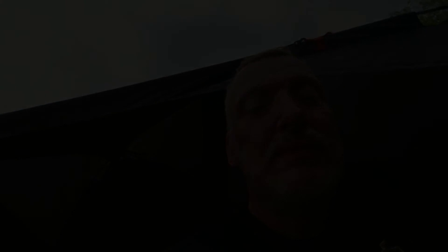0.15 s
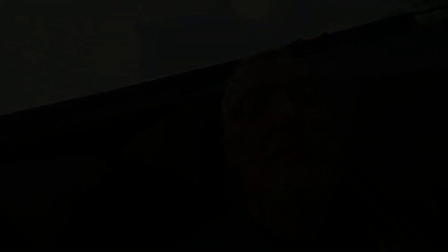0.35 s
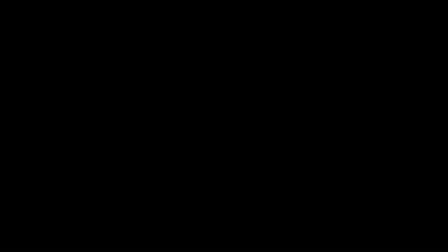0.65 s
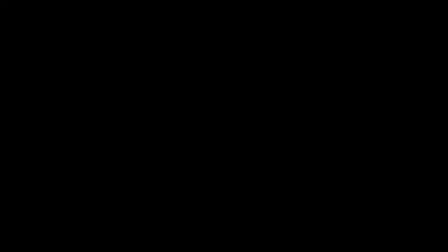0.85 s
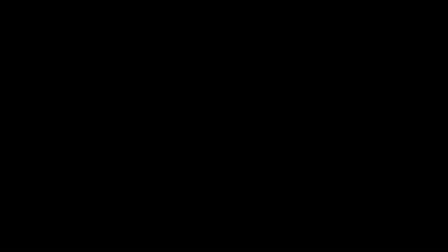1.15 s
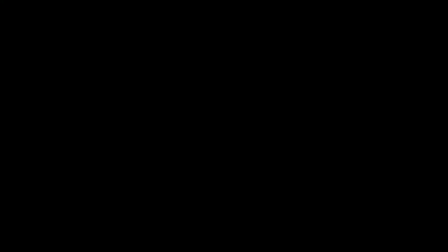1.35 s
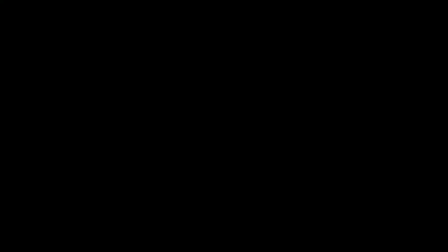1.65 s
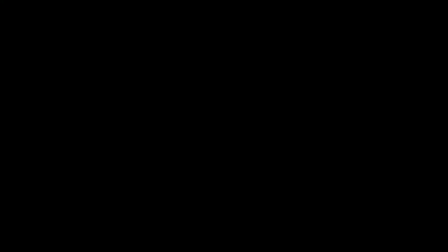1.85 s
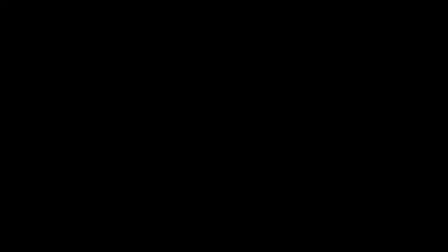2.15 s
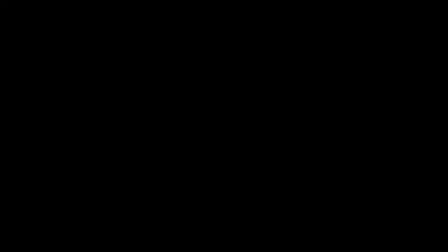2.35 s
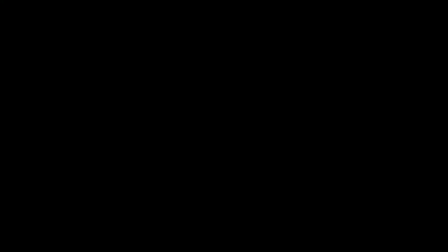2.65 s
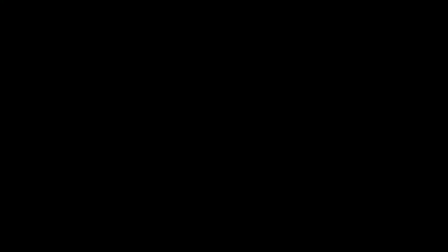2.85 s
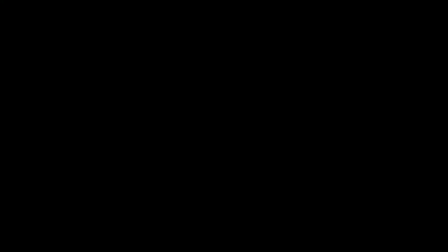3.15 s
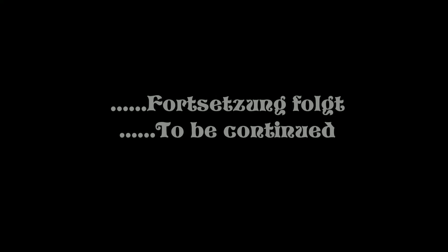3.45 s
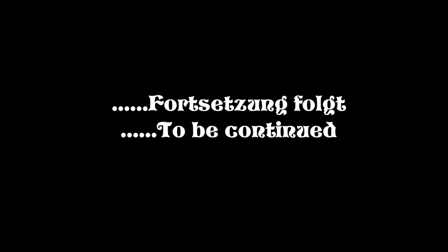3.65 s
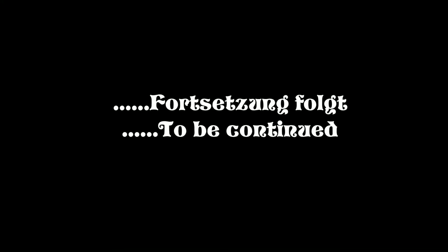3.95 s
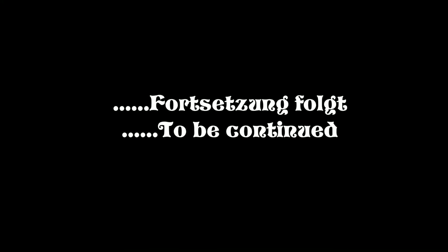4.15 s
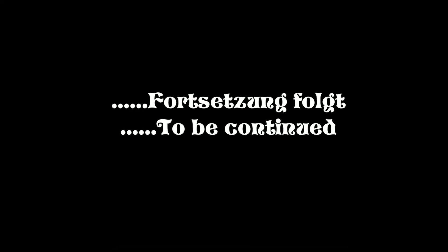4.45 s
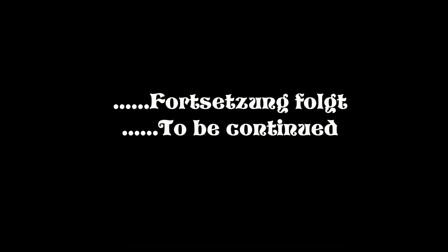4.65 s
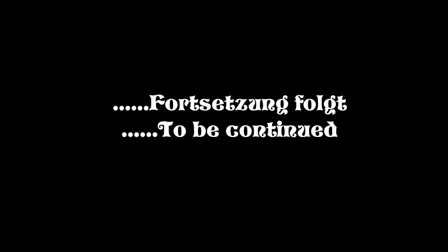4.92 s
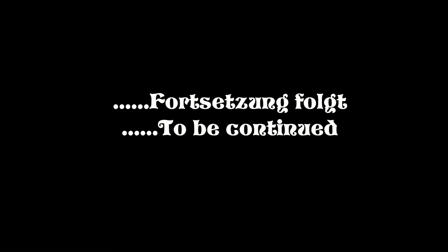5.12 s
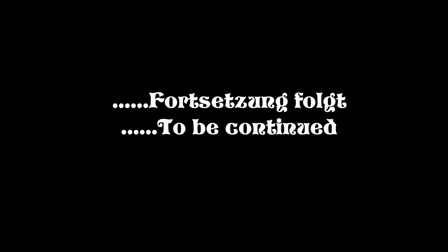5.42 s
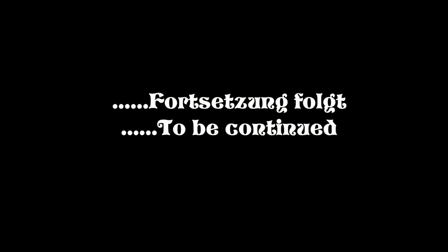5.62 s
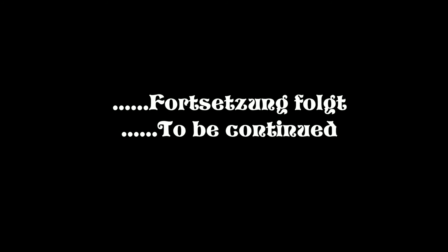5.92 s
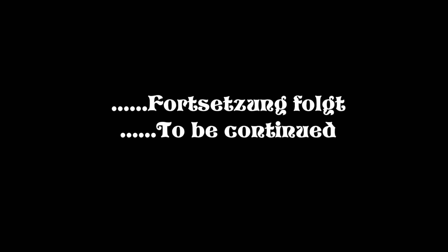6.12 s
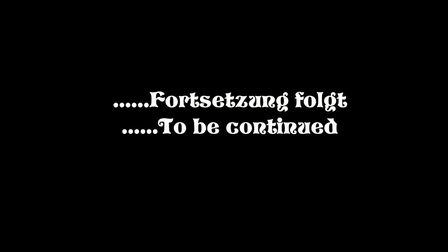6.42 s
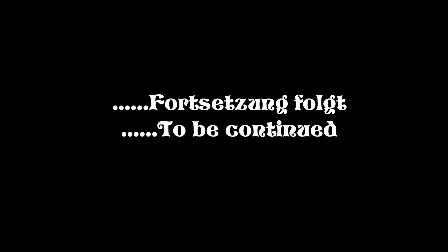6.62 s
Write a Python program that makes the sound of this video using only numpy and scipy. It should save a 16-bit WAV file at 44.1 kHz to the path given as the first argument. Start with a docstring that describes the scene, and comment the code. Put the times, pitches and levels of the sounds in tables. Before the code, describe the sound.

A motorcycle is started close to the microphone in an open place with nearby walls. First only low rumble and very faint ticks; then a sharp click, harsh geared cranking, coughs of gas and a failing slowdown. A brief pause with a faint motor whine, a second shorter grind, and the engine fires, holding a loud, quick, even idle with exhaust barks and tapping valves until the end.

```python
"""Outdoors near walls: low rumble, then a motorcycle is started. The switch clicks, the starter grinds and the
engine spits gas but dies; at the second try it catches and idles at about six cycles a second. Exhaust barks are
shaped noise, pipe and intake boom as sines bent by the piston, and valve gear and casing clatter as damped modes.
The starter is a run of tooth contacts ringing its housing, with a mesh tone that sags at each shove.
Filtered noise makes the rumble; each close part has its own short echoes."""
import sys
import numpy as np
from scipy import signal
from scipy.fft import rfft, irfft, next_fast_len
from scipy.io import wavfile
from scipy.ndimage import uniform_filter1d, map_coordinates

SR = 44100
rng = np.random.default_rng(int(sys.argv[2]) if len(sys.argv) > 2 else 0)


def transcribe(u):
    """Save the signal u as a 16-bit wav file named by the first command-line argument.

    u: samples, shape (n,) or (channels, n), limited to [-1, 1]; the rate is SR.
    q: integer samples, one column per channel.
    """
    v = np.clip(np.atleast_2d(u).T, -1, 1)
    q = np.round(v * 32767).astype(np.int16)
    wavfile.write(sys.argv[1], SR, q)


N = 298998
TIME = np.arange(N) / SR

# exhaust barks, one per engine cycle: [t/s, peak level/dB, casing ring level/dB, ring f/Hz]
FIRINGS = [(3.351, -10, -6.5, 2390), (3.5574, -8.5, -9.5, 2550), (3.722, -5.5, -13.5, 3020),
           (3.9032, -10.5, -7.5, 2600), (4.069, -5, -16, 4030), (4.2311, -9.5, -14, 4240),
           (4.396, -7, -16, 3740), (4.553, -8.5, -12, 2750), (4.722, -7, -9, 2730),
           (4.888, -6.5, -14.5, 3870), (5.062, -7, -10, 2830), (5.2272, -5, -7.5, 2836),
           (5.395, -8, -18, 2080), (5.559, -7.5, -8.5, 2870), (5.733, -8.5, -19, 2020),
           (5.891, -7.5, -12.5, 2120), (6.061, -9, -19.5, 2100), (6.223, -7, -15.5, 2100),
           (6.39, -7, -18, 3500), (6.561, -8.5, -14.5, 2030), (6.728, -9.5, -8, 2420)]
# intakes, each ending in a knock; strong and weak come to alternate: [knock t/s, gulp level/dB, knock level/dB]
INTAKES = [(3.509, -18.5, -15.5), (3.69, -19, -16), (3.864, -26, -14.5), (4.035, -17.5, -14),
           (4.2, -21, -11.5), (4.362, -21, -14.5), (4.521, -21, -14), (4.685, -21, -15.5),
           (4.855, -22.5, -15), (5.026, -21.5, -17), (5.192, -20.5, -16.5), (5.359, -27, -18),
           (5.524, -20, -16), (5.695, -25, -23), (5.862, -21.5, -17.5), (6.028, -28, -19.5),
           (6.195, -20, -17.5), (6.356, -27, -26), (6.527, -20, -21), (6.696, -23, -19.5)]
# spectrum of rattling engine metal: [f/Hz, level/dB]
METAL = [(200, 5), (400, 0.5), (620, 7), (1000, 0.5), (1350, -1.5), (1700, -1), (2050, 2.5), (2450, -10.5),
         (3000, -2), (4000, -7), (5500, -11), (8000, -18.5), (12000, -24.5), (15000, -55.5)]

BOOM_DB, SETTLE_DB_PER_S = -15.5, 1.2  # boom and light valve taps ease as the idle settles
BARK_DB = -4  # gas bark against the peak of its firing
SNAP_S = .0018  # rise time of switch snaps and small ticks


def undb(db):
    """Decibels to gain."""
    return 10 ** (np.asarray(db) / 20)


def unit(x):
    """Scale to rms 1."""
    return x / np.sqrt(np.mean(x ** 2) + 1e-20)


def noise(size=N):
    """White noise."""
    return rng.standard_normal(size)


def walk(rate):
    """Random levels held 1 / rate s and slewed; spread near 1."""
    hold = max(int(SR / rate), 1)
    steps = np.repeat(noise(N // hold + 1), hold)
    return 1.318 * uniform_filter1d(steps, hold)[:N]


def on_bins(points, size):
    """Read (Hz, value) points at the bins of an FFT, along a log frequency axis."""
    hz, value = np.transpose(points)
    bin_hz = np.arange(size // 2 + 1) * SR / size
    return np.interp(np.log(bin_hz + 1), np.log(hz), value)


def colour(x, points, size=4096):
    """Causal (minimum-phase) filter of unit power with the given spectrum."""
    cepstrum = irfft(on_bins(points, size) * np.log(10) / 20)
    cepstrum[1:size // 2] *= 2
    cepstrum[size // 2 + 1:] = 0
    response = irfft(np.exp(rfft(cepstrum)))
    return signal.fftconvolve(x, response / np.linalg.norm(response))[:N]


def ring(x, modes):
    """Damped resonances (Hz, width Hz, dB) of unit power; a wider mode dies sooner."""
    t = TIME[:SR // 4]
    response = sum(undb(db) * width * np.exp(-np.pi * width * t) * np.sin(2 * np.pi * hz * t)
                   for hz, width, db in modes)
    return signal.fftconvolve(x, response / np.linalg.norm(response))[:N]


def add(track, s, sound):
    """Mix a sound in at a time."""
    start = int(np.clip(s * SR, 0, N))
    track[start:start + len(sound)] += sound[:N - start]


def blows(rows, rise, decay):
    """Envelope of (s, dB) blows that build up and die away; overlaps add in power."""
    t, power = TIME[:SR // 5], np.zeros(N)
    shape = np.minimum(t / rise, 1) * np.exp(-np.maximum(t - rise, 0) / decay)
    for s, db in rows:
        add(power, s, (undb(db) * shape) ** 2)
    return np.sqrt(power)


def swells(rows):
    """Sum of soft-edged plateaus (s, length s, height)."""
    out = np.zeros(N)
    for s, length, height in rows:
        add(out, s, height * signal.windows.tukey(int(length * SR), .5))
    return out


def impacts(rate, spread_db):
    """Dense metal contacts of unequal size."""
    hits = rng.random(N) < rate / SR
    return unit(hits * noise() * undb(spread_db * np.clip(noise(), -2, 2)))


def narrow(hz, width_hz):
    """A narrow, rough band of sound that follows a pitch curve."""
    turn = 2 * np.pi * np.cumsum(hz) / SR
    return (walk(width_hz) * np.sin(turn) + walk(width_hz) * np.cos(turn)) / 1.08


def cycles():
    """Each engine cycle as (s, period s, boom dB, bark dB)."""
    s, peak_db, _, _ = np.transpose(FIRINGS)
    period = np.diff(s)
    boom_db = BOOM_DB - SETTLE_DB_PER_S * (s - s[0])
    return np.transpose([s, np.append(period, period[-1]), boom_db, peak_db + BARK_DB])


def exhaust():
    """A sharp bark as the valve opens, a hissing tail, and spits of gas."""
    # spits of gas: [t/s, length/s, level/dB]
    spit_rows = [(1.59, 0.055, -24.5), (1.666, 0.12, -30), (1.763, 0.048, -18.5), (1.878, 0.029, -32),
                 (2.14, 0.087, -32.5), (2.407, 0.11, -39), (3.425, 0.062, -28.5), (3.975, 0.019, -29),
                 (5.465, 0.014, -28.5), (5.802, 0.0081, -21), (6.131, 0.015, -23), (6.462, 0.014, -26.5)]
    # spectra of the bark and of the loose gas: [f/Hz, level/dB]
    bark_spectrum = [(150, 9.5), (300, -1.8), (480, -10), (750, -6), (1300, -10.5), (1900, -6.5),
                     (2400, -6), (3000, -4), (4200, -11.5), (6200, -9.5), (8000, -11), (10000, -10.5),
                     (12000, -13.5), (15000, -20)]
    gas_spectrum = [(200, -30), (400, -3), (580, 5), (800, -11.5), (1200, -22), (2000, -4.5), (3000, -6.5),
                    (4500, -18), (6500, -14.5), (9000, -13.5), (12000, -22), (15000, -22)]
    spit_spectrum = [(1000, 5.0), (3000, -4.0), (8000, -5.5), (12000, -3.0), (15000, -11.0)]

    barks = cycles()[:, [0, 3]]
    crack = blows(barks, rise=0.0062, decay=0.0021) * undb(-2.0)
    tail = blows(barks, rise=0.02, decay=0.0035) * undb(-34)
    # a soft breath of gas about half a cycle after each firing
    breaths = [(s + 0.485 * period, -34 + 0.43 * noise(size=1)[0]) for s, period, _, _ in cycles()]
    overlap = blows(breaths, rise=0.0033, decay=0.015)
    spits = swells([(s, length, undb(db)) for s, length, db in spit_rows])
    gas = colour(noise() * (overlap + .6 * spits), gas_spectrum)
    bright_gas = colour(noise() * spits * 0.61, spit_spectrum)
    return colour(impacts(16000, 10.3) * crack + noise() * tail, bark_spectrum) + gas + bright_gas


def gulp(length, open_hz, low_hz, close_hz, swell_db, steep):
    """Cylinder and pipe boom as one vessel whose pitch follows the piston; the waves are bent lopsided by a set
    steepness."""
    piston = np.linspace(-1, 1, int(length * SR))
    bend_hz = np.where(piston < 0, open_hz - low_hz, close_hz - low_hz)
    hz = low_hz + bend_hz * piston ** 2
    wave = -np.sin(2 * np.pi * np.cumsum(hz) / SR)
    opening = signal.windows.tukey(len(piston), .25) * undb(swell_db * piston)
    return np.sqrt(2) * (wave + steep * (wave ** 2 - .5)) * opening


def booms():
    """A firm exhaust stroke and a weaker intake each cycle; the valves kick the pipe as they open and shut."""
    # the exhaust stroke: [delay after firing/s, length/s, opening f/Hz, mid-stroke f/Hz, closing f/Hz]
    blowdown = (.0056, .0687, 123.4, 50.7, 111.2)
    # the intake stroke: [lead before its knock/s, length/s, opening f/Hz, mid-stroke f/Hz, closing f/Hz]
    suction = (.053, .061, 42, 60, 120)
    # the cylinder gulps air while it is cranked: [t/s, length/s, level/dB]
    crank_gulps = [(1.725, 0.145, -32.5), (1.859, 0.086, -32.5), (2.019, 0.116, -24), (2.159, 0.106, -23.5),
                   (3.055, 0.13, -30.5)]
    # resonances of the exhaust pipe: [f/Hz, width/Hz, level/dB]
    pipe_modes = [(122, 18.2, 4), (165, 31, -17), (206.8, 22, -2.5), (257, 22, -16), (304, 26, -17)]
    flow_spectrum = [(70, -32.5), (120, 0.5), (170, -1.5), (225, 0.5), (300, -7.0), (400, -25.5), (900, -39.5)]
    opening_s, closing_s = .0096, .056  # exhaust valve, after the firing
    intake_shut_s = .008  # before the intake's knock

    out, puffs = np.zeros(N), np.zeros(N)
    for s, _, db, _ in cycles():
        stroke = gulp(*blowdown[1:], swell_db=-1.5 + 0.99 * noise(size=1), steep=-0.12)
        add(out, s + blowdown[0], undb(db) * stroke)
        add(puffs, s + opening_s, -undb(db + 19.5 + 1.5 * noise(size=1)))
        add(puffs, s + closing_s, undb(db + 24 + 3.1 * noise(size=1)))
    for s, db, _ in INTAKES:
        add(out, s - suction[0], undb(db) * gulp(*suction[1:], swell_db=4.0, steep=0.18))
        add(puffs, s - intake_shut_s, -undb(db + 19 + 1.5 * noise(size=1)))
    # rough flow noise rides on the running strokes, not on the cranking gulps
    flow = uniform_filter1d(np.abs(out), SR // 50) * noise()
    for s, length, db in crank_gulps:
        add(out, s, undb(db) * gulp(length, 71.7, 52.2, 81, swell_db=0.0, steep=0.14))
    return out + ring(puffs, pipe_modes) + undb(-15.5) * colour(flow, flow_spectrum)


def strike(taps, focus=6):
    """Each tap (s, dB, Hz) rings the casing modes near its own pitch (focus: dB/octave), in a fresh mix."""
    # what the engine casing rings with: [f/Hz, width/Hz, level/dB]
    casing = [(545, 67, 2), (636, 45, -5), (800, 11, -18), (988, 147, 7), (1660, 101, -3), (2016, 88, -8.5),
              (2214, 160, -1.5), (2665, 253, 4.5), (2892, 176, -0.5), (3254, 200, 2), (3706, 156, 3),
              (4210, 180, -6), (4805, 77, -7), (5170, 190, -4), (6800, 89, -0.5)]
    scatter_db, detune_share = 4.5, .018

    t, out = TIME[:SR // 30], np.zeros(N)
    hz, width, mode_db = np.transpose(casing)[:, :, None]
    for s, db, centre_hz in taps:
        size, detune, phase = rng.standard_normal((3, len(casing), 1))
        away = np.log2(hz / centre_hz)  # octaves
        near_db = 15.7 * np.exp(-(away / 0.14) ** 2)
        scattered_db = mode_db + scatter_db * np.clip(size, -1.5, 1.5)
        gain = undb(scattered_db - focus * np.abs(away) + near_db)
        tones = np.sin(2 * np.pi * (hz * (1 + detune_share * detune) * t + phase))
        modes = gain / np.linalg.norm(gain) * np.exp(-np.pi * width * t) * tones
        add(out, s, undb(db) * modes.sum(0) * np.minimum(t / 0.0014, 1))
    return out


def thuds():
    """The whole engine jerks in its frame and rings briefly."""
    # dull thuds as the piston goes over compression, and one brighter ring just after a firing: [t/s, level/dB,
    # f/Hz]
    thud_rows = [(1.627, -13.5, 468), (1.797, -28.5, 474), (1.802, -12, 180), (3.68, -20.5, 493),
                 (3.857, -24, 480), (4.075, -16, 980), (4.191, -23, 500), (4.355, -24, 500),
                 (4.517, -30, 520)]
    t, out = TIME[:SR // 15], np.zeros(N)
    envelope = np.minimum(t / 0.00028, 1) * np.exp(-t / 0.0039)
    for s, db, hz in thud_rows:
        add(out, s, undb(db) * np.sin(2 * np.pi * hz * t) * envelope)
    return out


def clatter():
    """Firings knock on the casing over a continuous churn of gears and chain."""
    # single knocks of the starter drive and engine: [t/s, level/dB]
    knock_rows = [(1.564, -12.5), (1.598, -26), (1.72, -30), (2.017, -24.5), (2.112, -25.5), (2.259, -24),
                  (2.907, -11.5), (3.165, -26)]
    # spectrum of the starter pinion's knock: [f/Hz, level/dB]
    pinion_spectrum = [(300, -24), (800, -2), (1300, -2), (1850, 8.5), (2400, -1.5), (3100, 5.5),
                       (4200, -5), (7000, -18.5), (14000, -36.5)]

    # a churn of gears and chain swells after the catch, then eases but goes on
    churn_db = np.interp(TIME, [3.3, 3.36, 3.6, 3.85, 6.7], [-102, -40.0, -33.5, -43.0, -50.0])
    rattle = colour(impacts(450, 0.83) * undb(churn_db + 1.0 * walk(40)), METAL)
    jolts = strike([(s + 0.0047, db, hz) for s, _, db, hz in FIRINGS]) * undb(4.0)
    slaps = undb(-10) * strike([(s, db, 680) for s, _, _, db in cycles()], focus=2.4)
    knock_envelope = blows(knock_rows, rise=0.0037, decay=0.0016)
    knocks = colour(impacts(3900, 1.0) * knock_envelope, pinion_spectrum)
    return rattle + jolts + slaps + knocks + thuds()


def valve_gear():
    """Valves and rockers tap the casing, scrape a little and bounce once."""
    # valves snap onto their seats before and after each firing: [t/s, level/dB, f/Hz]
    seat_taps = [(3.4181, -18, 1800), (3.5379, -10.5, 2040), (3.6102, -11, 2140), (3.704, -11.5, 2100),
                 (3.7768, -13.5, 2900), (3.8831, -14, 2940), (3.9579, -11.5, 2080), (4.0512, -9.5, 3080),
                 (4.119, -10, 2900), (4.2164, -13, 3050), (4.2847, -12.5, 2100), (4.3789, -11, 2360),
                 (4.4458, -11, 3020), (4.5371, -11, 2660), (4.6064, -13.5, 3000), (4.7057, -10, 2900),
                 (4.774, -15, 1930), (4.8704, -13, 1680), (4.9384, -15.5, 2900), (5.0439, -13, 2800),
                 (5.1158, -15, 2880), (5.2084, -13.5, 2090), (5.2814, -22, 2130), (5.3762, -16, 1900),
                 (5.4475, -12, 3000), (5.5413, -15, 2860), (5.6134, -21, 1830), (5.7159, -17, 1810),
                 (5.7862, -17, 2490), (5.876, -18, 2080), (5.9454, -21.5, 1800), (6.0437, -16.5, 2040),
                 (6.115, -14, 3450), (6.2068, -15, 2300), (6.2726, -19, 1910), (6.3709, -15.5, 1840),
                 (6.4438, -15, 2050), (6.545, -13.5, 2150), (6.6144, -15, 1930), (6.7116, -15.5, 2480)]
    # light contacts between the knocks: [share of the cycle, level/dB, f/Hz]
    light_contacts = [(0.226, -16.5, 1680), (0.334, -18, 3000), (.755, -27.5, 600)]

    light = []
    for s, period, _, _ in cycles():
        settle_db = SETTLE_DB_PER_S * (s - FIRINGS[0][0])
        for share, db, hz in light_contacts:
            at = s + share * period + 0.0016 * noise(size=1)[0]
            light.append((at, db + 0.87 * noise(size=1)[0] - settle_db, hz))
    intake_knocks = [(s, db, 1730) for s, _, db in INTAKES]
    taps = np.vstack([seat_taps, light, intake_knocks])
    bounces = [(s + rng.uniform(0.00217, .007), db - 8.5, hz) for s, db, hz in taps]
    scrape = colour(impacts(4500, 0.35) * blows(taps[:, :2], rise=0.0028, decay=.0055), METAL)
    return undb(-5.5) * (strike(taps) + strike(bounces)) + undb(-14.5) * scrape


def turning():
    """Steady load on the gears: full when the starter engages, fading toward a coast, then running out."""
    # two tries of the starter: [start t/s, stop t/s, turning gears level/dB, fade as it slows/(dB/s)]
    tries = [(1.544, 2.596, -23, 29), (2.903, 3.463, -25, 8.5)]
    coast_db = -55.5  # gears that turn without load
    run_out_s = 0.041  # the gears come to rest, or the pinion lets go

    load = np.zeros(N)
    for start, stop, db, fade_db_per_s in tries:
        t = TIME[:int((stop - start) * SR)]
        turning_load = undb(db - fade_db_per_s * t) + undb(coast_db)
        add(load, start, turning_load * np.minimum(t[::-1] / run_out_s, 1))
    return uniform_filter1d(load, SR // 200)


def shoving():
    """Load, mesh tone level, mesh and ring pitch: each shove bites, holds, lets go; pitch sags until the next."""
    # the starter shoves against the piston:
    # [t/s, length/s, level/dB, mesh f/Hz, mesh tone level/dB, f/Hz where the housing rings most]
    shoves = [(1.56, 0.032, -20.5, 824.3, -27, 2260), (1.605, 0.018, -14, 837, -34, 1955),
              (1.654, 0.038, -22, 833.7, -23, 2017), (1.71, 0.037, -17, 840, -16.5, 2232),
              (1.765, 0.093, -32, 731, -32.5, 1930), (1.893, 0.033, -23, 832, -27, 2738),
              (1.943, 0.042, -23, 819.7, -29, 2700), (2.151, 0.044, -33, 622.3, -44, 2200),
              (2.314, 0.071, -24.5, 834.5, -28, 1970), (2.35, 0.02, -40, 793, -50, 1780),
              (2.39, 0.12, -32, 737.5, -33, 609.4), (2.952, 0.074, -18.5, 840, -19.5, 1890),
              (3.024, 0.015, -13.5, 796, -27, 2110), (3.042, 0.0054, -20, 726, -28, 2000),
              (3.083, 0.049, -22, 843, -18.5, 2640), (3.135, 0.01, -21.5, 790, -21, 2037),
              (3.219, 0.036, -20, 837, -26, 2740), (3.284, 0.028, -16, 835, -42, 3050),
              (3.315, 0.016, -18.5, 850, -31, 2055)]
    attack_s, release_s, ease_db_per_s = 0.0025, 0.0042, 55
    mesh_sag_hz_per_s, slowest_mesh_hz, ring_sag_hz_per_s = 1000, 562, 1500
    mesh_build_s = 0.0051  # the mesh tone takes a moment to build up and to die

    load, tone, t = np.zeros(N), np.zeros(N), TIME[:SR // 4]
    mesh_hz, ring_hz = np.full(N, 1. * slowest_mesh_hz), np.full(N, 1. * shoves[0][5])
    for s, length, db, start_hz, tone_db, housing_hz in shoves:
        release = np.exp(-np.maximum(t - length, 0) / release_s)
        grip = np.minimum(t / attack_s, 1) * release * undb(-ease_db_per_s * t)
        add(load, s, grip * undb(db))
        add(tone, s, grip * undb(tone_db))
        start = int(s * SR)
        since = TIME[:N - start]
        mesh_hz[start:] = start_hz - mesh_sag_hz_per_s * since
        ring_hz[start:] = housing_hz - ring_sag_hz_per_s * np.minimum(since, t[-1])
    keep = np.exp(-1 / (mesh_build_s * SR))
    tone = signal.lfilter([1 - keep], [1, -keep], tone)
    mesh_hz = uniform_filter1d(np.maximum(mesh_hz, slowest_mesh_hz), SR // 100)
    return load, tone, mesh_hz, ring_hz


def grinding(load, ring_hz):
    """The pinion's teeth catch in a rough run of contacts; each rings the housing in a mix of its own."""
    # what the starter housing rings with: [f/Hz, width/Hz, level/dB]
    housing = [(610, 33, -5.5), (813, 61, -5.5), (1042, 44, -9), (1370, 64, -4.5), (1743, 120, -5.5),
               (1990, 34, -6), (2240, 96, -7), (2630, 140, -11), (2990, 200, -6.5), (3730, 82, -7.5),
               (5150, 176, -9.5), (6600, 180, -12)]
    contacts_per_s, scatter_db, accent_db = 230, 4, 3  # the rate wanders around this mean
    bend_s, burst_db, level_db = .0008, 2.5, -14

    turn = np.cumsum(contacts_per_s * (1 + .4 * np.tanh(walk(200)))) / SR
    at, out = np.flatnonzero(np.diff(np.floor(turn))), np.zeros(N)
    for hz, width, db in housing:
        size, side = rng.standard_normal((2, N // 100))[:, :len(at)]
        accent = accent_db * np.exp(-(np.log2(hz / ring_hz[at]) / 0.23) ** 2)
        contacts = np.zeros(N)
        contacts[at] = load[at] * np.sign(side) * undb(db + accent + scatter_db * np.tanh(size))
        out += ring(contacts, [(hz, width, 0)])
    # the ringing bends in pitch as the pinion rocks under load
    out = map_coordinates(out, [(TIME + bend_s * walk(25)) * SR], order=3)
    return out * np.sqrt(SR / contacts_per_s) * undb(level_db + burst_db * np.tanh(walk(80)))


def starter():
    """Gear teeth grind into a ringing housing and whine, harder at each shove: (grinding, mesh tone)."""
    # spectrum of the gear teeth: [f/Hz, level/dB]
    gear_spectrum = [(175, -27), (350, -28.5), (580, 8), (700, -11.5), (820, 6.5), (1020, -12), (1400, -2),
                     (1900, -6.5), (2700, -8), (3800, -13), (5200, -23.5), (8000, -21), (12000, -18),
                     (15000, -71)]
    # harmonics of the mesh tone, from the first up: [level/dB]
    partials_db = [-3, -14, -25, -29.5]
    hiss_spectrum = [(2000, -4.0), (5500, -5.5), (9000, -7.5), (14000, -20.5)]
    hiss_db, shove_hiss_db = -10.5, -15  # rubbing against the turning gears and against the shoves
    tooth_noise_db, squeal_db, squeal_width_hz = -14, -12.5, 120
    pinion_teeth, rasp_db = 8, 4.5

    steady = turning()
    shoves, tone, mesh_hz, ring_hz = shoving()
    load = np.hypot(steady, shoves)
    # play between the teeth makes the mesh tone flutter
    flutter = .018 * (walk(250) + 0.686 * walk(45))
    turn = 2 * np.pi * np.cumsum(mesh_hz * (1 + flutter)) / SR
    mesh = sum(undb(db + 4 * np.tanh(walk(70))) * np.sin(k * turn) for k, db in enumerate(partials_db, 1))
    teeth = impacts(5000, 1.2) * load * undb(5.7 * np.tanh(walk(110)) + tooth_noise_db)
    rubbing = np.hypot(steady * undb(hiss_db), shoves * undb(shove_hiss_db))
    hiss = colour(noise() * rubbing, hiss_spectrum)
    # the pinion runs off centre and bites hardest once a turn; under load the housing squeals
    rasp = unit(undb(rasp_db * np.cos(turn / pinion_teeth)))
    squeal = narrow(ring_hz, squeal_width_hz) * shoves * undb(squeal_db)
    grind = grinding(load * rasp, ring_hz) + colour(teeth * rasp, gear_spectrum) + hiss * rasp + squeal
    return grind, mesh * tone * rasp * undb(-1.0)


def switch():
    """The switch snaps with a short bright tail, and its spring rings."""
    # the starter switch snaps: [t/s, level/dB]
    snap_rows = [(1.418, -5.5)]
    # spectrum of the snap: [f/Hz, level/dB]
    snap_spectrum = [(750, -8), (1500, -11.5), (2500, -11), (3400, -6), (5000, -8), (7000, -2), (9000, 3),
                     (12000, 4.5), (15000, -0.5), (16000, -14)]
    # ringing of the spring: [f/Hz, width/Hz, level/dB]
    spring_modes = [(2080, 130, -7), (3320, 75, 6), (4100, 81, -3), (6150, 150, -18), (6500, 120, -26)]

    kicks = np.zeros(N)
    for s, db in snap_rows:
        add(kicks, s + SNAP_S, undb([db + 1.5]))
    snap = blows(snap_rows, rise=SNAP_S, decay=SNAP_S) * undb(-5.5)
    tail = blows(snap_rows, rise=SNAP_S, decay=0.011) * undb(-26.5)
    return colour(noise() * (snap + tail), snap_spectrum) + ring(kicks, spring_modes)


def relay():
    """The plunger hits its contacts with a short, bright clack."""
    # the starter relay slams shut as each try begins: [t/s, level/dB]
    slams = [(1.549, -11), (2.894, -20)]
    # spectrum of its clack: [f/Hz, level/dB]
    clack_spectrum = [(350, -48.5), (600, -33), (1160, -6), (2750, -20.5), (3060, -14), (5040, -14),
                      (5460, -7), (7550, -2), (8750, -8.5), (11900, -17), (15000, -19)]
    return colour(noise() * blows(slams, rise=0.0058, decay=0.002), clack_spectrum)


def whine():
    """A small motor sings faintly between the two tries, over a little brush hiss."""
    # steady tones of the motor: [f/Hz, level/dB]
    motor_tones = [(2310, -61), (4020, -61), (4320, -71), (5324, -72), (11000, -78)]
    brush_spectrum = [(1500, -14), (4200, 4), (7000, -6), (11000, -4), (15000, -28)]

    tones = np.zeros(N)
    for hz, db in motor_tones:
        level = undb(db + 3.5 * np.tanh(walk(60)))
        tones += level * np.sin(2 * np.pi * hz * np.cumsum(1 + 0.005 * walk(300)) / SR)
    brushes = undb(-66) * colour(noise(), brush_spectrum)
    return (tones + brushes) * swells([(2.62, 0.28, 0.62)])


def small_sounds():
    """Faint squeaks that sink in pitch, and a few light metal ticks before the start."""
    # faint ticks of a small metal part: [t/s, level/dB]
    tick_rows = [(.638, -58), (.675, -54), (.697, -51), (.767, -61)]
    # modes of that part: [f/Hz, width/Hz, level/dB]
    tick_modes = [(4450, 410, -4), (6200, 500, -21), (7600, 700, -12), (10500, 2500, -10)]
    # faint thin squeaks: [t/s, length/s, level/dB, start f/Hz, end f/Hz]
    squeaks = [(.24, .24, -77, 4850, 4720), (.55, .18, -72, 3680, 3520)]

    out = ring(noise() * blows(tick_rows, rise=SNAP_S, decay=SNAP_S), tick_modes)
    for s, length, db, start_hz, end_hz in squeaks:
        hz = np.linspace(start_hz, end_hz, int(length * SR))
        tone = np.sin(2 * np.pi * np.cumsum(hz) / SR)
        add(out, s, undb(db) * signal.windows.tukey(len(hz), .5) * tone)
    return out


def hums():
    """Faint bands of hum that creep up in pitch."""
    # hum bands that rise out of the rumble: [t/s, length/s, level/dB, start f/Hz, end f/Hz]
    hum_rows = [(.45, .45, -47, 235, 250), (.85, .7, -45, 255, 268), (.8, .65, -51, 445, 470)]
    out = np.zeros(N)
    for s, length, db, start_hz, end_hz in hum_rows:
        hz = np.interp(TIME, [s, s + length], [start_hz, end_hz])
        out += narrow(hz, width_hz=14) * swells([(s, length, undb(db))])
    return out


def rumble_db():
    """The outdoor rumble swells slowly, then fades quickly from 1.53 s to a faint remnant."""
    start_db, swell_db_per_s = -32.5, 2
    fade_s, fade_db_per_s, left_db = 1.53, 106, -48
    fade_db = fade_db_per_s * np.maximum(TIME - fade_s, 0)
    return np.maximum(start_db + swell_db_per_s * TIME - fade_db, left_db)


def outdoors(spectrum, wide_hz):
    """Wavering rumble: the bass is the same left and right, the rest is diffuse."""
    mid, side = (unit(colour(noise() * undb(1.05 * walk(14.5)), spectrum)) for _ in range(2))
    side = signal.sosfilt(signal.butter(2, wide_hz, "high", fs=SR, output="sos"), side)
    return mid + 1.23 * side * np.array([[1], [-1]])


def place(x, pan, wet_db, t60):
    """Sound reaches two ports with different level and phase; near walls add a tail of shifting colour."""
    # phase by which the left port leads: [f/Hz, phase/rad]
    port_phase = [(300, 0), (1050, .6), (1550, 2.6), (1850, 0), (3000, .8), (4900, 0), (6200, -1),
                  (8400, -3.1), (12000, -6.3), (15500, -9.4)]
    echo_shift_per_s = 7

    size = next_fast_len(N + SR // 4, True)
    tilt, lag = undb(on_bins(pan, size) / 2), np.exp(-1j * on_bins(port_phase, size))
    ports = rfft(x, size) * np.array([tilt, 1 / tilt])
    direct = irfft(ports * np.array([np.ones(len(lag)), lag]), size)[:, :N]
    # three decaying noise tails per port, whose shares drift against each other
    t = TIME[:SR // 5]
    walls = rng.standard_normal((3, 2, len(t))) * undb(-60 * t / t60) * (t > .003)
    high_pass = signal.butter(2, 300, "high", fs=SR, output="sos")
    walls = signal.sosfilt(high_pass, walls / np.linalg.norm(walls[0, 0]))
    shares = np.array([walk(echo_shift_per_s) for _ in walls])
    shares /= np.sqrt(np.sum(shares ** 2, axis=0) + 0.11)
    heard = irfft(ports, size)[:, :N]
    echoes = sum(signal.oaconvolve(heard * share, wall, axes=1)[:, :N] for share, wall in zip(shares, walls))
    return direct + undb(wet_db) * echoes


def scene():
    """The bike close by, drifting slowly toward the middle, over the outdoor rumble; close parts echo."""
    # stereo balance of engine and starter: [f/Hz, left minus right level/dB]
    engine_pan = [(60, 2.7), (300, 1.8), (700, 4.7), (1300, 3), (2400, 5), (4400, 8.6), (8000, 3.8),
                  (15000, 1.1)]
    starter_pan = [(380, 2), (750, 11.2), (1300, 5.9), (2400, 6.9), (4400, 11), (8000, 2.4), (15000, 1.3)]
    # spectra of the rumble and of the still air: [f/Hz, level/dB]
    rumble_spectrum = [(25, -48.5), (65, 2.5), (152, 0), (205, -12.5), (256, -11), (340, -20), (460, -17),
                       (620, -24.5), (1000, -18), (1400, -26), (2000, -31), (3000, -46.5), (5000, -63.5),
                       (15000, -103)]
    air_spectrum = [(25, 12.5), (80, 5.5), (170, -3.5), (600, -20.5), (2000, -28.5), (5000, -52),
                    (15000, -63.5)]
    switch_pan = [(500, 1.9), (12000, -.5)]
    relay_pan = [(500, 3.6), (5000, 6.2), (12000, 0.93)]

    pipe = place(booms() + exhaust(), engine_pan, wet_db=-5.5, t60=0.094)
    block = place(clatter(), engine_pan, wet_db=-1.0, t60=0.067)
    valves = place(valve_gear(), engine_pan, wet_db=-2, t60=0.18)
    drift_db = np.interp(TIME, [3.4, 6.7], [.6, -.9])  # added to left minus right
    engine = (pipe + block + valves) * undb(np.array([drift_db, -drift_db]) / 2)
    grind, mesh = starter()
    cranking = place(grind, starter_pan, wet_db=-3.0, t60=0.14)
    cranking = cranking + place(mesh + whine(), starter_pan, wet_db=-8.5, t60=0.15)
    clicks = place(switch() + small_sounds(), switch_pan, wet_db=-25, t60=0.18)
    clacks = place(relay(), relay_pan, wet_db=-11, t60=0.154)
    rumble = outdoors(rumble_spectrum, 330) * undb(rumble_db()) + hums()
    air = outdoors(air_spectrum, 400) * undb(-37.0)
    background = (rumble + air) * undb(np.array([[.4], [-.4]]))
    return engine + cranking + clicks + clacks + background


def record(dry):
    """The microphone drops the deepest bass and rounds the highest peaks; the top is cut."""
    top_hz, peak = 15700, .85
    thin = signal.sosfiltfilt(signal.butter(3, 36, "high", fs=SR, output="sos"), dry)
    rounded = peak * np.tanh(thin / peak)
    return signal.sosfilt(signal.ellip(8, .2, 80, top_hz, fs=SR, output="sos"), rounded)


dry = scene()
out = record(dry)
transcribe(out)
```